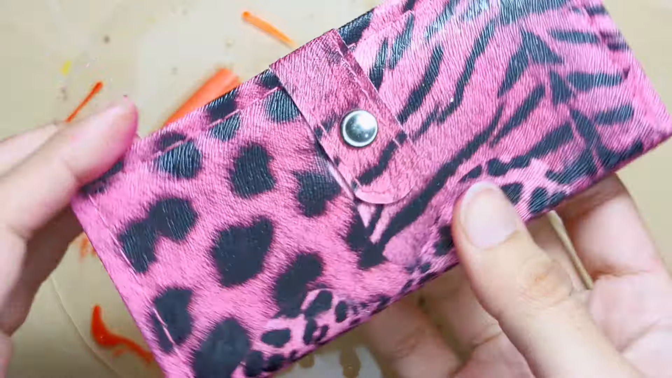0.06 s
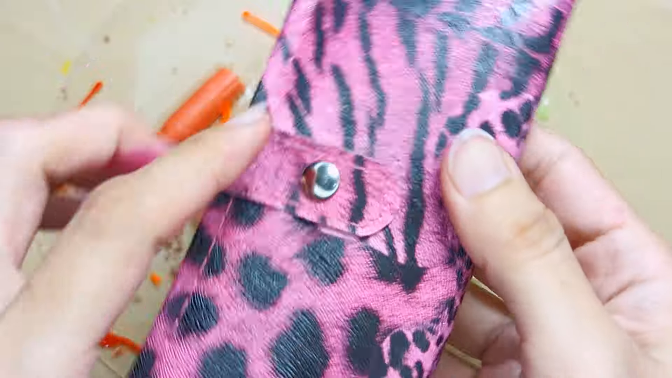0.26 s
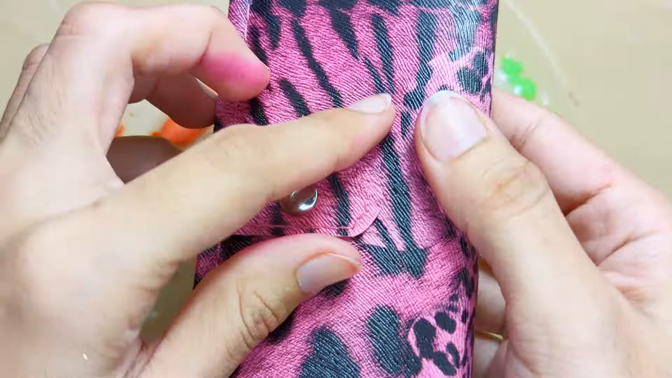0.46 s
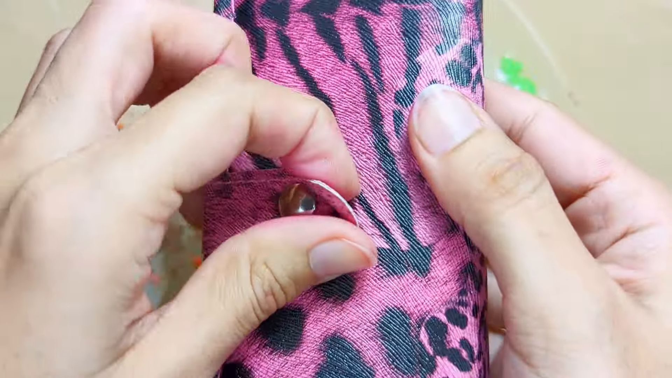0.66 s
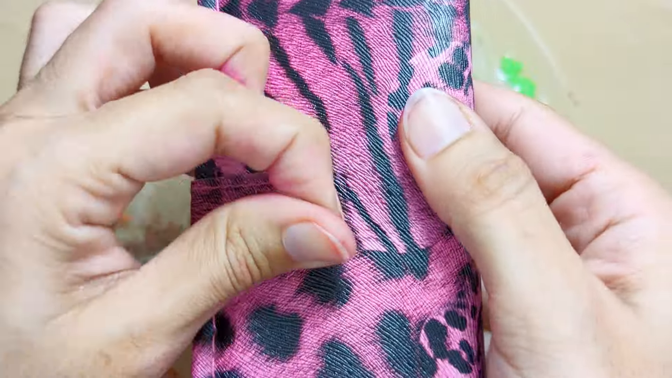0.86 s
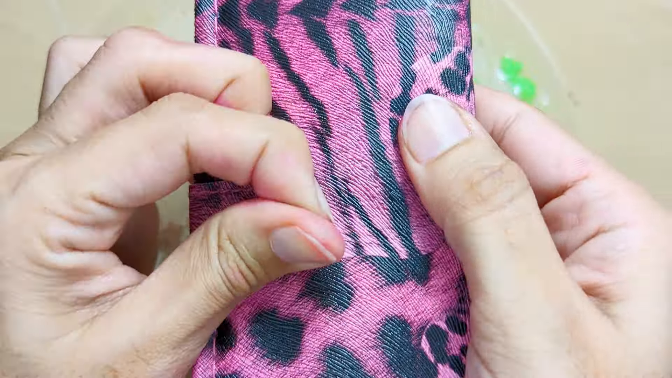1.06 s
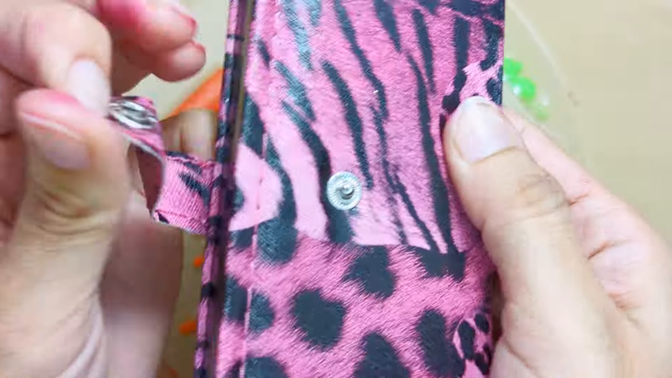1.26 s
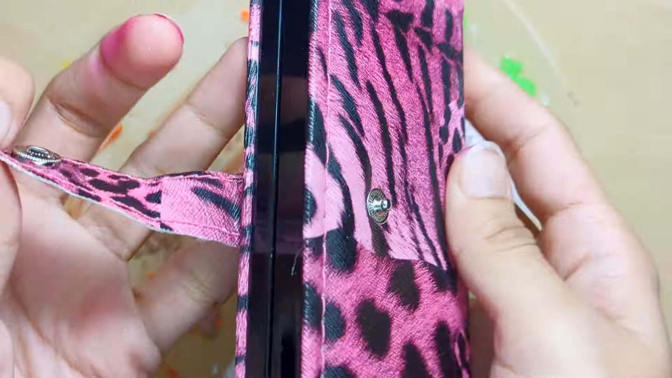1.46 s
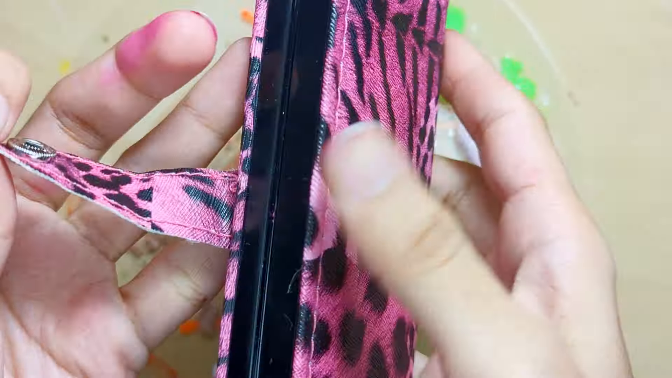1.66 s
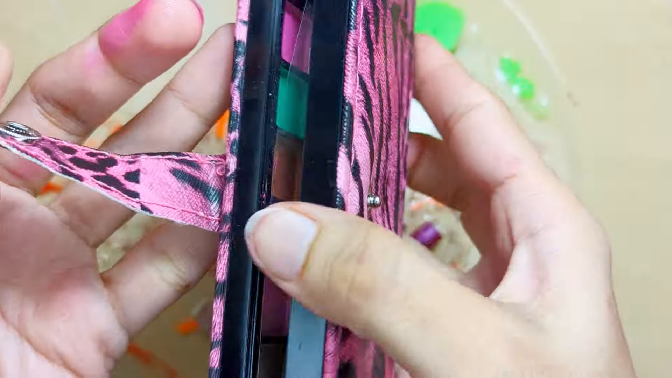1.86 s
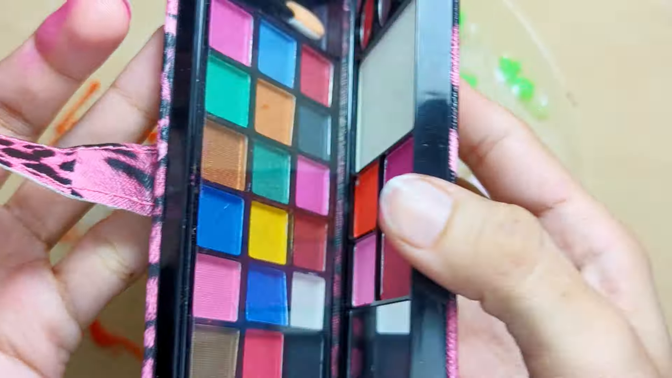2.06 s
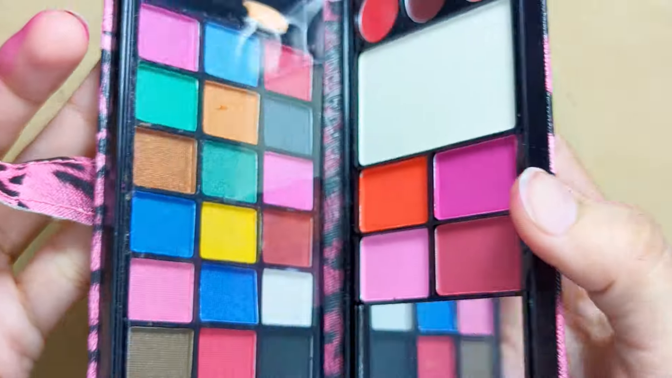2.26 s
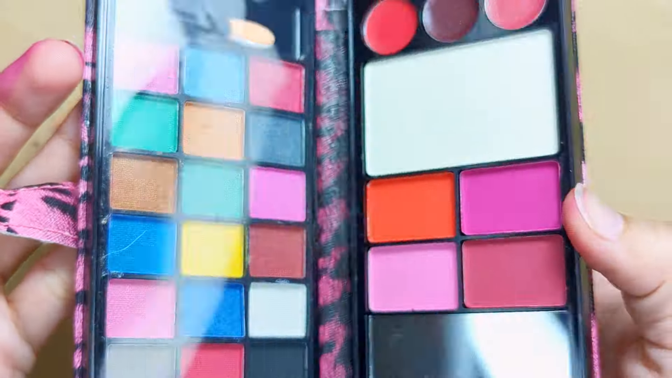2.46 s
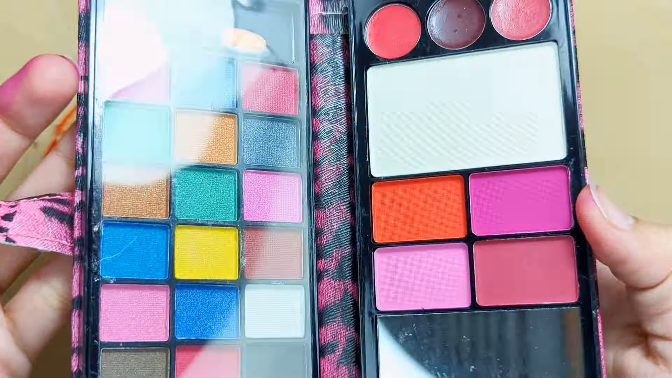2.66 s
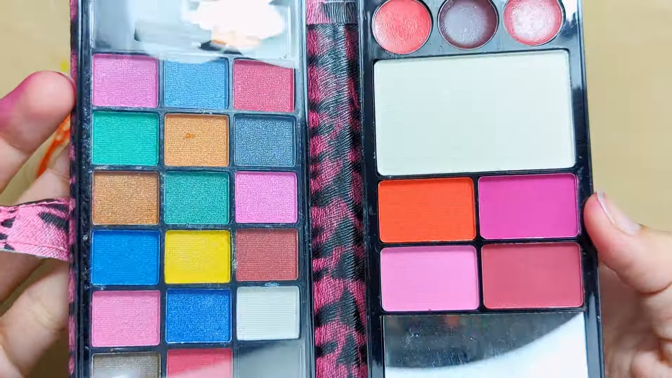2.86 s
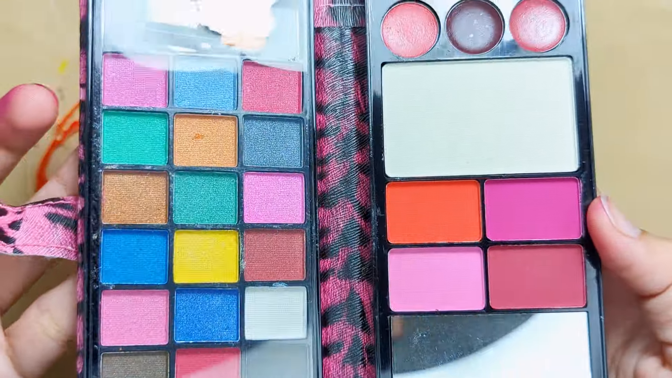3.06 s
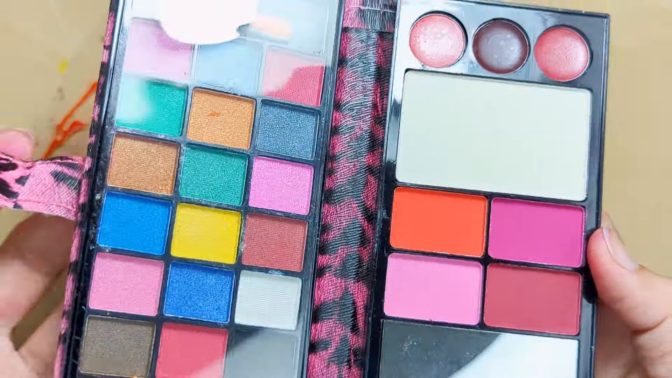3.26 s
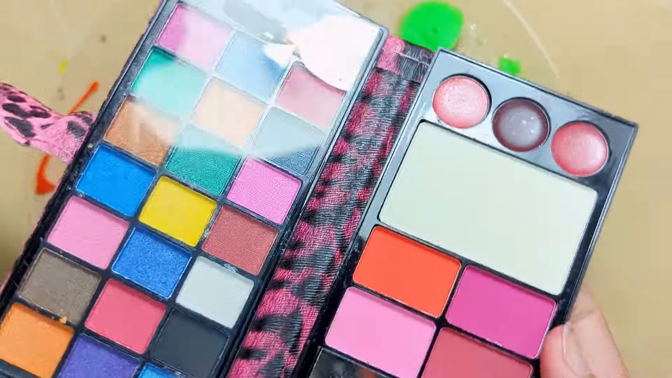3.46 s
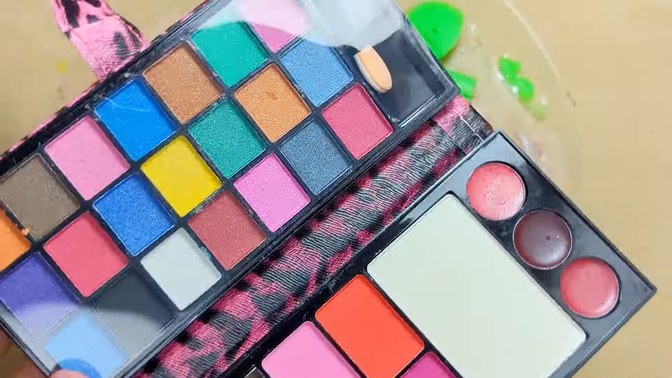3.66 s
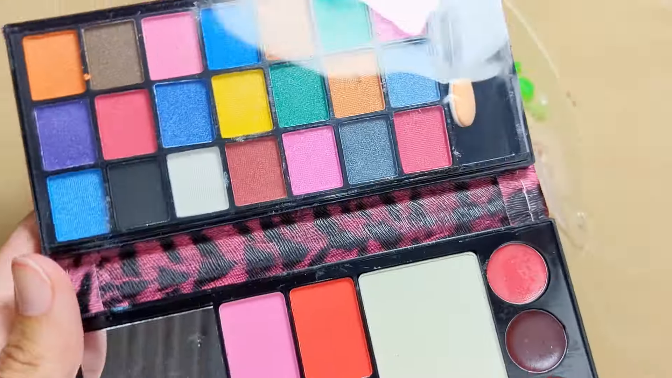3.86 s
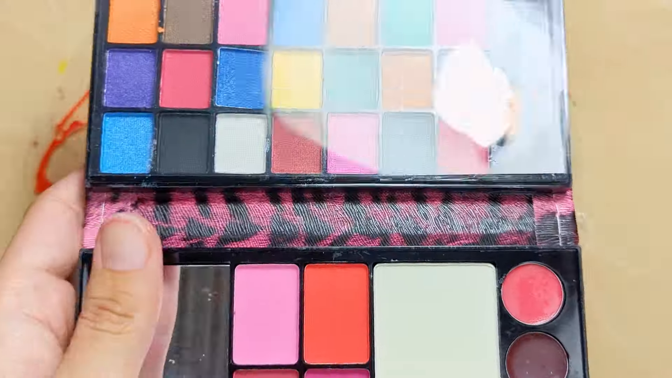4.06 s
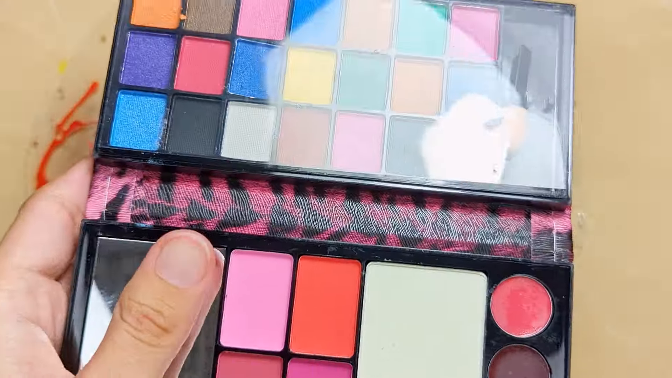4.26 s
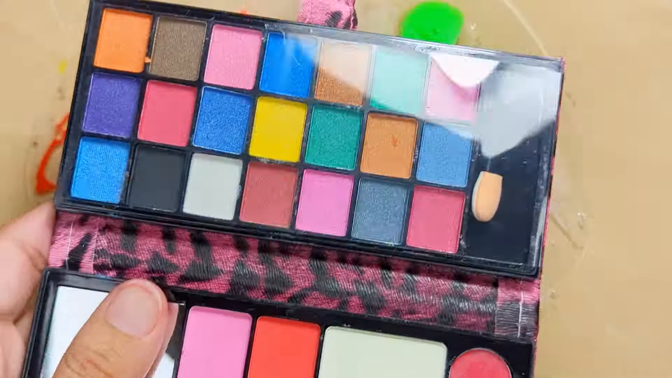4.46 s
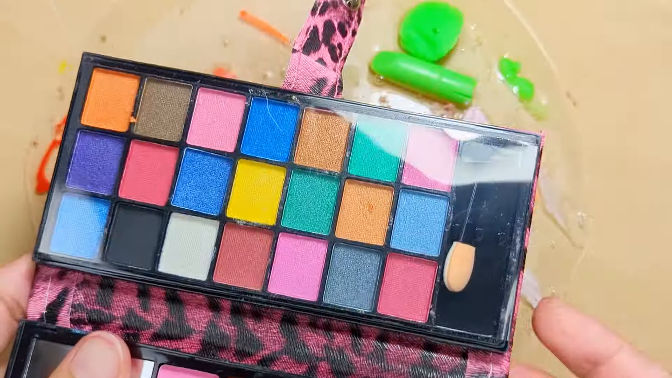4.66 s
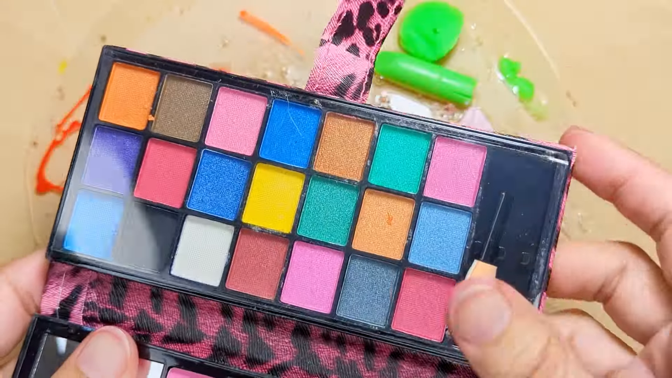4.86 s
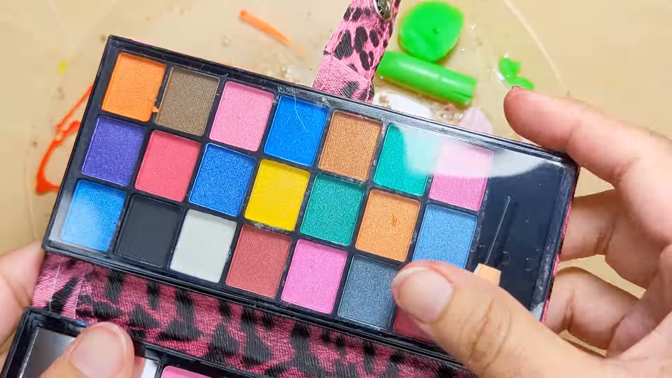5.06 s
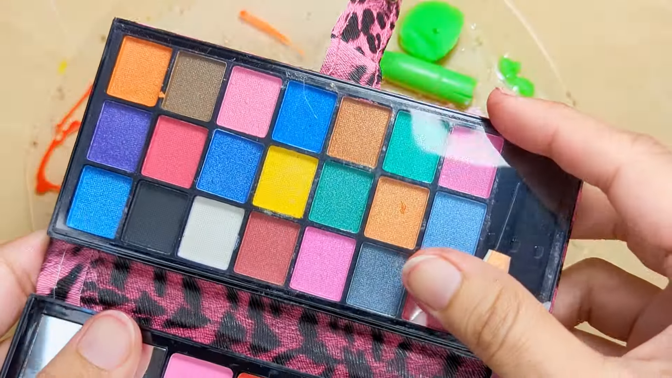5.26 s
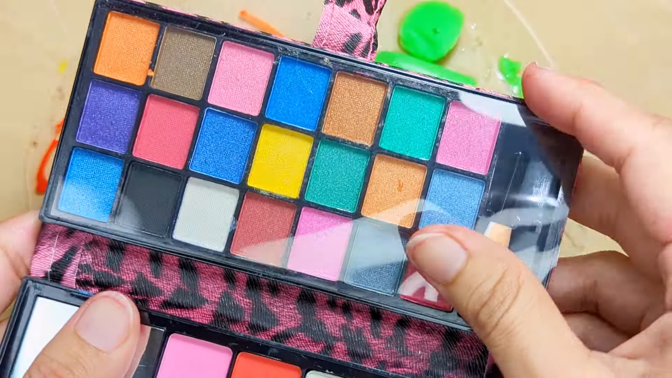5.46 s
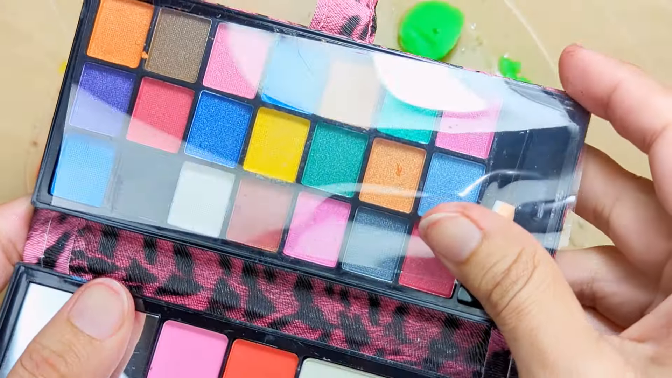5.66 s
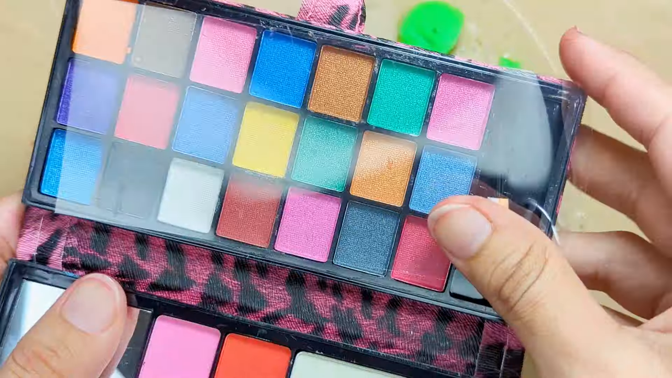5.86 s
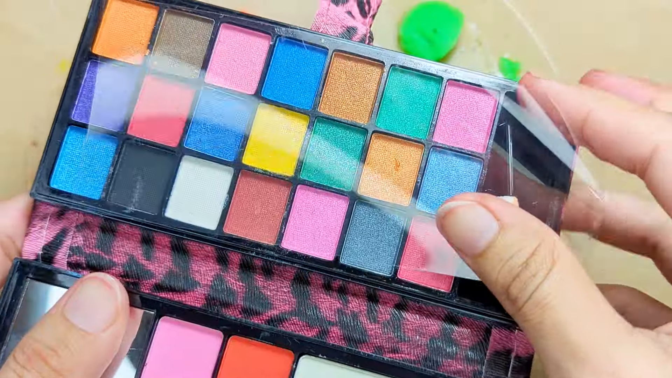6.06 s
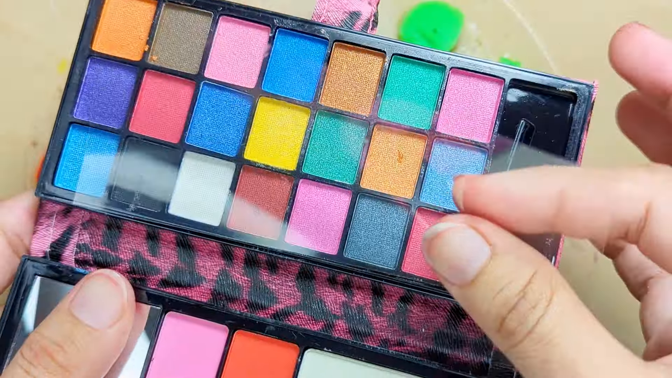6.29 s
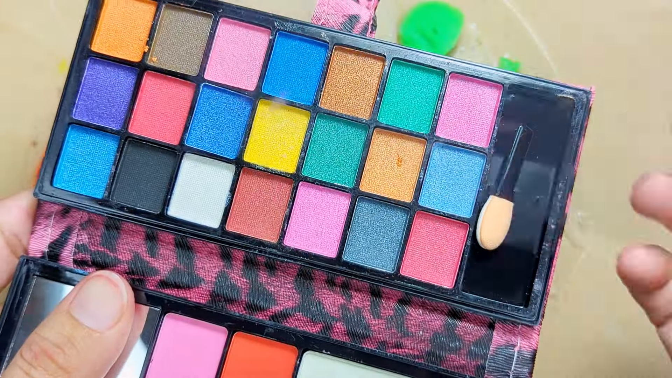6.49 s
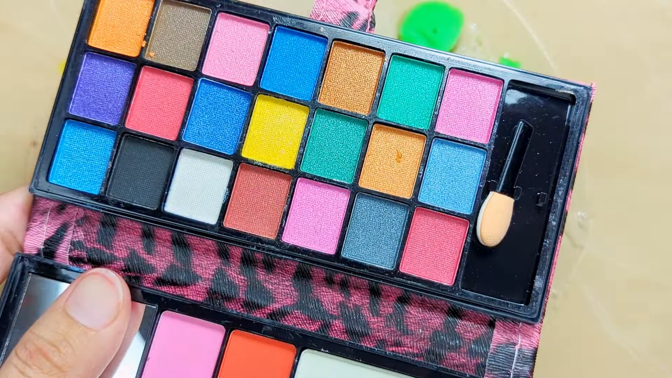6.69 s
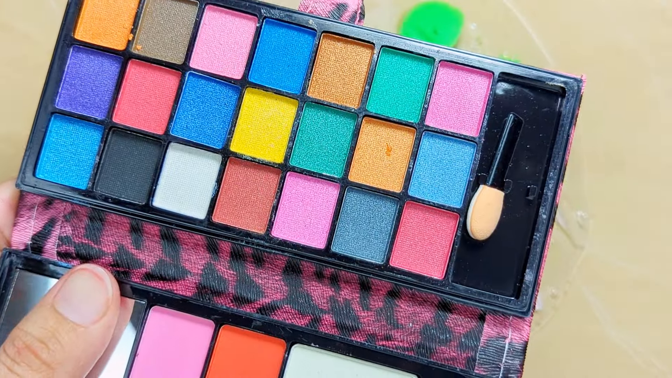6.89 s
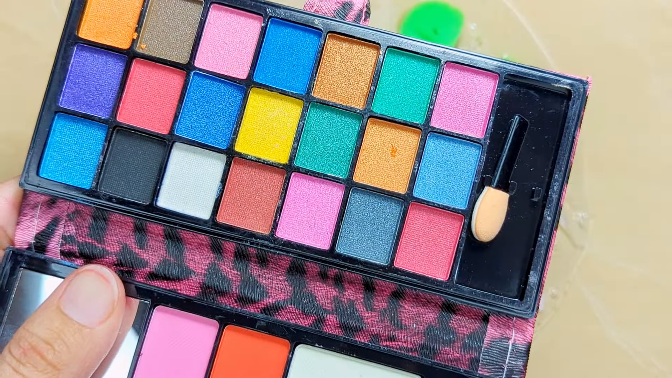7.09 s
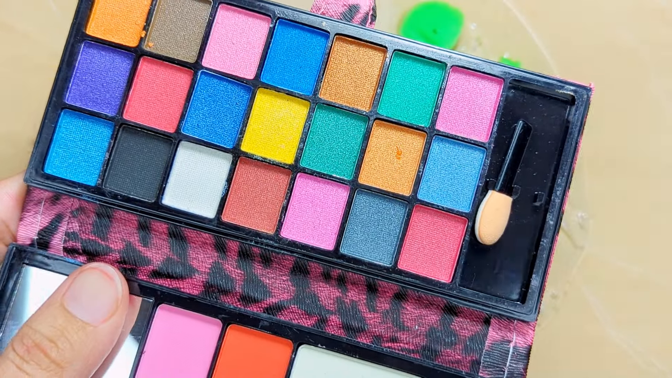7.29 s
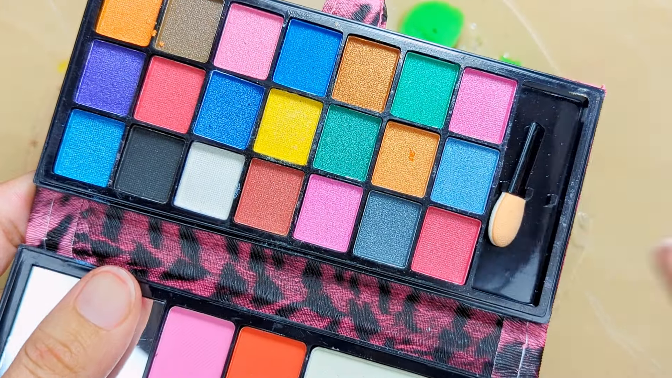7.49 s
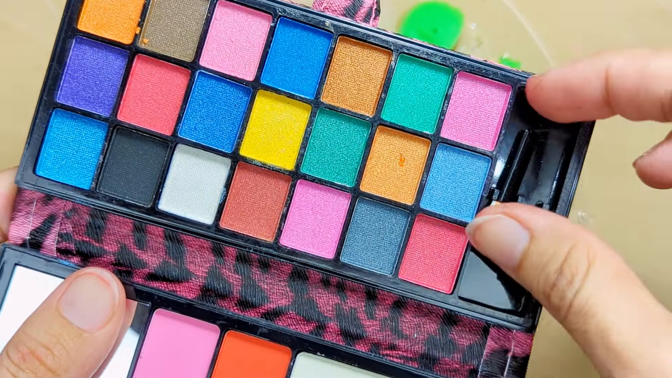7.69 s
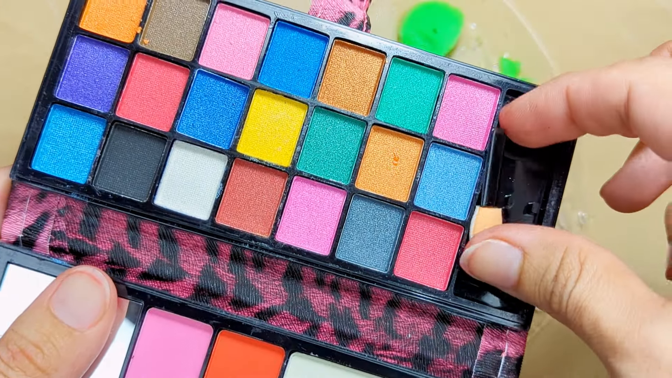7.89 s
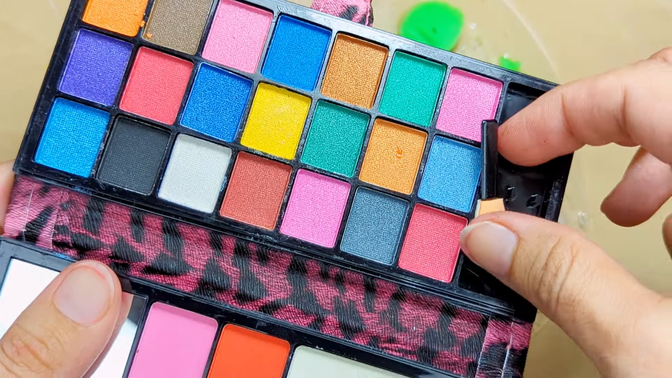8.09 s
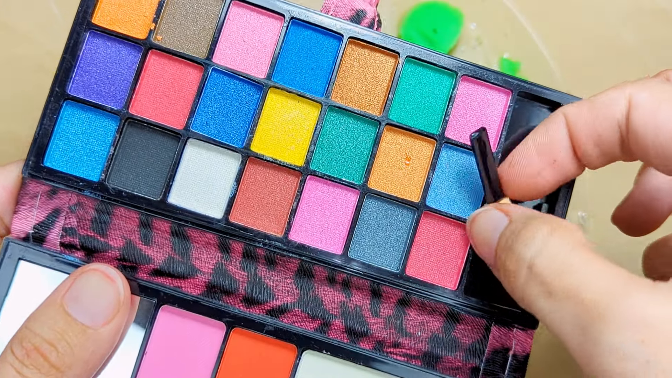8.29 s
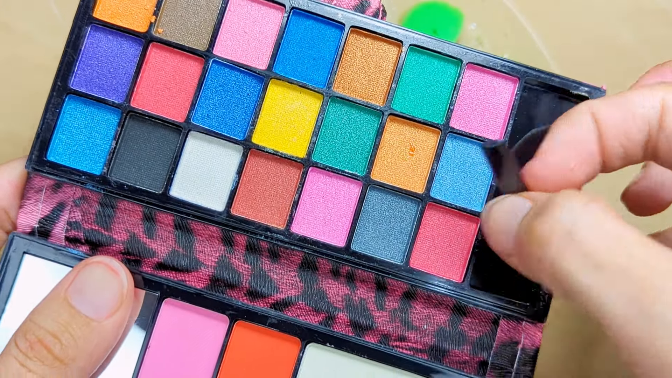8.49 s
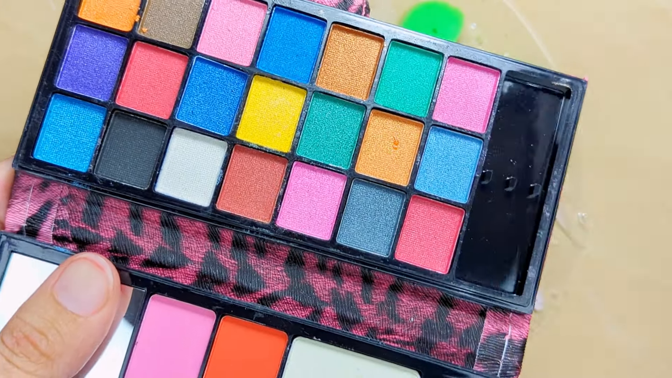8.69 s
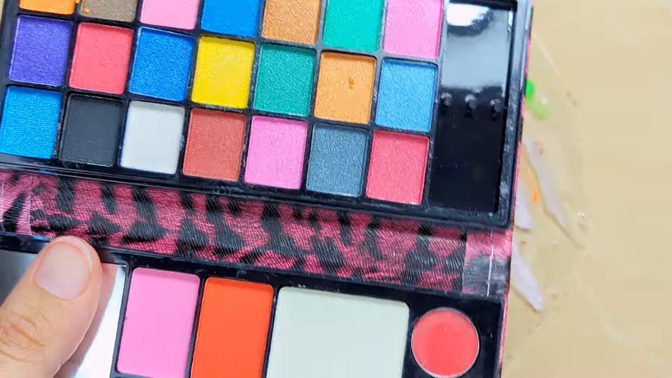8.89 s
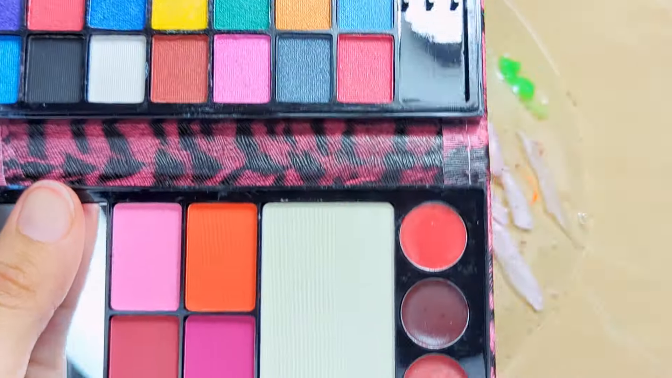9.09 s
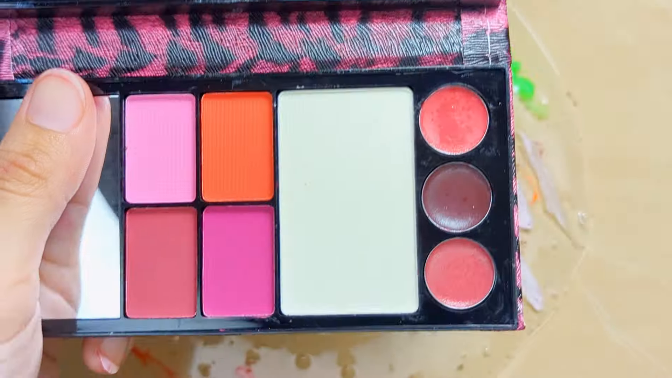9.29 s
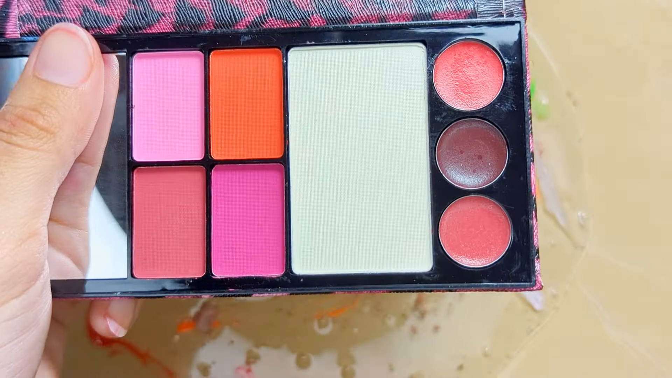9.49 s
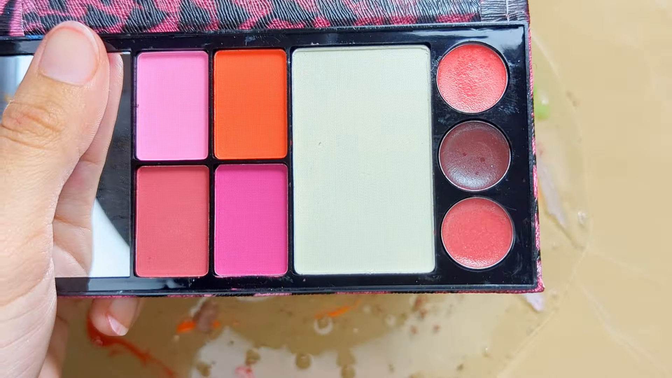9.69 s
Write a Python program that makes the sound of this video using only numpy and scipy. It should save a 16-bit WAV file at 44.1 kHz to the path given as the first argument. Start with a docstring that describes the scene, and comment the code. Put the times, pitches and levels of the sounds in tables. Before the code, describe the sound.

Small, dry handling sounds in stereo over a low mains hum and soft hiss. Brief finger rubs and a dull tap lead to a harsh stud snap just after one second. The case opens with rubs and bright ticks; turning it is almost silent. Around six seconds a flexible plastic sheet crackles loose with a sharp double snap and puff, then sparse clicks and a final dull bump.

```python
"""Opening a plastic makeup case

A padded plastic makeup case is handled close to two microphones in a quiet room with a mains hum.
Its metal press stud pops open, a sum of damped modes and a noisy crack that overloads the microphones.
Fingers rub the leatherette cover, a clear plastic sheet is scraped off the palette, and a small applicator
is prised from its slot: strokes are grains of tiny slips, and clicks are decaying bursts,
both coloured by the resonances of the plastic. The walls add a decaying tail."""
import sys
import numpy as np
from scipy import signal
from scipy.fft import rfft, irfft, next_fast_len
from scipy.io import wavfile
from scipy.ndimage import map_coordinates

SR = 44100
rng = np.random.default_rng(int(sys.argv[2]) if len(sys.argv) > 2 else 0)


def generate_wav(sig):
    """Save sig (samples, or channels by samples) to the path in sys.argv[1] as 16-bit PCM at SR."""
    pcm = np.round(np.clip(np.atleast_2d(sig).T, -1, 1) * 32767).astype(np.int16)
    wavfile.write(sys.argv[1], SR, pcm)


N = 429707


def amp(db):
    """Level to amplitude: 20 dB is a factor of ten."""
    return 10 ** (np.asarray(db) / 20)


def unit(x):
    """Normalization: scale to an rms of 1."""
    return x / np.sqrt(np.mean(x ** 2) + 1e-20)


def along(points, hz):
    """Interpolation on a logarithmic frequency axis through (Hz, value) points."""
    point_hz, values = np.transpose(points)
    return np.interp(np.log(hz + 1), np.log(point_hz + 1), values)


def filtered(x, response):
    """Linear filtering: the spectrum of x is multiplied by a response of frequency."""
    n = x.shape[-1]
    padded = next_fast_len(n + 2048)
    spectrum = rfft(x, padded) * response(np.fft.rfftfreq(padded, 1 / SR))
    return irfft(spectrum, padded)[..., :n]


def pair(size, gain, alike):
    """Partial coherence: mid and side noises share power so that left and right correlate as asked."""
    def mid_side_gains(hz):
        angle = np.arccos(np.clip(along(alike, hz), -1, 1)) / 2
        return gain(hz) * np.array([np.cos(angle), np.sin(angle)])
    mid, side = filtered(rng.standard_normal((2, size)), mid_side_gains)
    return np.array([mid + side, mid - side])


# Steady tones of the mains. Each row: frequency in Hz, level in dB rms.
HUM_TONES = [(100, -56), (200, -80)]
# Spectrum of the low room noise. Each row: frequency in Hz, relative density in dB per Hz.
RUMBLE_SPECTRUM = [(20, -29), (35, -18), (50, -1.5), (65, 0.5), (85, 0), (130, -8), (220, -10), (380, -8),
                   (520, -11.5), (800, -27), (1500, -70.5)]
# Spectrum of the hiss. Each row: frequency in Hz, relative density in dB per Hz.
HISS_SPECTRUM = [(290, -31), (500, -9), (726, -9), (900, -15.5), (1100, -16.5), (1450, -20.5),
                 (2600, -22.5), (3500, -29), (5200, -36), (6500, -36), (8000, -43), (9300, -40),
                 (15500, -45.5)]
# Coherence of the room noise. Each row: frequency in Hz, left-right correlation (1 is identical).
ROOM_COHERENCE = [(60, 1), (130, 0.4), (220, .3), (500, 0.27), (1500, 0.058)]


def background(rumble_db=-57.0, hiss_db=-68, whine_db=-95, whine_hz=6400, whine_width_hz=220):
    """Stationary sources: mains harmonics, shaped noise for rumble and hiss, narrow noise for a fuzzy whine."""
    t = np.arange(N) / SR
    hum = np.zeros(N)
    for hz, rms_db in HUM_TONES:
        hum += amp(rms_db) * np.sqrt(2) * np.sin(2 * np.pi * (hz * t + rng.random()))
    rumble = unit(pair(N, lambda hz: amp(along(RUMBLE_SPECTRUM, hz)), ROOM_COHERENCE))
    hiss = unit(pair(N, lambda hz: amp(along(HISS_SPECTRUM, hz)), ROOM_COHERENCE))
    whine_peak = lambda hz: 1 / (1 + ((hz - whine_hz) / whine_width_hz) ** 2)
    whine = unit(pair(N, whine_peak, ROOM_COHERENCE))
    return hum + amp(rumble_db) * rumble + amp(hiss_db) * hiss + amp(whine_db) * whine


# Decay of the room. Each row: frequency in Hz, time to fall by 60 dB in seconds.
ROOM_DECAY = [(200, 0.43), (1500, 0.3), (5000, 0.11), (12000, 0.1)]


def room(x, wet_db):
    """Reverberation: convolution with noise whose every frequency decays at its own rate."""
    hz, t, z = signal.stft(rng.standard_normal((2, SR // 2)), SR, nperseg=256)
    decay = amp(-60 * t / along(ROOM_DECAY, hz)[:, None])
    tail = signal.istft(z * decay, SR, nperseg=256)[1]
    onset_s = .006
    tail = tail * (1 - np.exp(-np.arange(tail.shape[1]) / SR / onset_s))
    unit_energy_tail = tail / np.linalg.norm(tail[0])
    return amp(wet_db) * signal.fftconvolve(x, unit_energy_tail, axes=1)[:, :N]


# Place of the hands. Each row: time in seconds, lead of the left microphone in seconds.
LEFT_LEAD = [(0, .0001), (1.1, .000115), (2.1, .00013), (5.4, .00038), (5.9, .00036), (6.25, .00014),
             (6.43, .00014), (6.65, .00032), (8, .00038), (9, 0)]


def add(track, s, sound):
    """Interaural-style delay: opposite phase slopes shift the channels by half the lead each."""
    lead = np.interp(s, *np.transpose(LEFT_LEAD))
    signs = np.array([[1], [-1]])
    placed = filtered(sound, lambda hz: np.exp(1j * np.pi * hz * lead * signs))
    start = round(s * SR)
    placed = placed[:, max(-start, 0):N - start]
    track[:, max(start, 0):][:, :placed.shape[1]] += placed


# Low (body) register of the plastic. Each row: frequency in Hz, relative level in dB before the body setting.
BODY_REGISTER = [(60, -25), (200, -7.5), (380, -1.5), (560, 5), (720, -1), (900, -5.5), (1350, 2.5),
                 (1700, -1.5)]
# Middle register of the plastic. Each row: frequency in Hz, relative level in dB.
MIDDLE_REGISTER = [(2100, 1), (2600, 2.5), (3500, -1), (4700, -0.5), (5600, -7)]
# Top (edge) register of the plastic. Each row: frequency in Hz, relative level in dB before the edge setting.
EDGE_REGISTER = [(6700, 4), (7900, -0.5), (9200, 1), (11500, -6.5), (15500, -20)]


def contact(size, body_db, edge_db, ring=lambda hz: 1):
    """Modal density: noise shaped by the plastic's crowded resonances, with rms 1 in the middle register."""
    body = [(hz, level + body_db) for hz, level in BODY_REGISTER]
    edge = [(hz, level + edge_db) for hz, level in EDGE_REGISTER]
    points = body + MIDDLE_REGISTER + edge
    # every point of contact stirs the modes in its own proportions
    modes = rng.standard_normal(size=400)
    uneven_db, mode_spacing_hz = 3, 90

    def gain(hz):
        uneven = map_coordinates(modes, [hz / mode_spacing_hz], mode="mirror")
        g = amp(along(points, hz) + uneven_db * uneven) * ring(hz)
        middle = (hz > 2200) * (hz < 6000)
        return g / np.sqrt(np.mean(g ** 2 * middle))

    return pair(size, gain, [(500, .9), (2000, 0.21), (9000, 0.2)])


def add_stroke(out, s, length, db, body_db, edge_db, gain_db=-1, fade_db=17,
               panel_hz=2450, panel_db=5, panel_width=0.25, damped_hz=18000):
    """Stick-slip friction: a swell of tiny random slips, each shaking the shell."""
    slips_per_s, slip_life_s, smooth = 3000, .0012, 2  # smooth: steady part under the slips
    waver_points_per_s, waver_db = 40, 1.5
    rise_share = .42  # of the stroke's length

    def panel(hz):
        resonance = amp(panel_db / (1 + ((hz / panel_hz - 1) / panel_width) ** 2))  # width relative to panel_hz
        return resonance / np.sqrt(1 + (hz / damped_hz) ** 8)

    rise, fall = length * rise_share, length * (1 - rise_share)
    t = np.arange(-2 * rise, 3 * fall, 1 / SR)
    # the pressure wavers along the stroke
    pressure = map_coordinates(rng.standard_normal(size=200), [(t - t[0]) * waver_points_per_s], mode="mirror")
    distance = np.abs(np.where(t < 0, t / rise, t / fall))
    stroke = amp(waver_db * pressure - fade_db * distance ** 1.6)
    slips = (rng.random(len(t)) < slips_per_s / SR) * rng.exponential(size=len(t))
    decaying_slips = signal.lfilter([1], [1, -np.exp(-1 / (slip_life_s * SR))], slips)
    grain = unit(smooth + decaying_slips)
    add(out, s + t[0], amp(db + gain_db) * stroke * grain * contact(len(t), body_db, edge_db, panel))


def add_click(out, s, db, ring_hz, body_db, edge_db, gain_db=5, t60=0.023,
              slide_db=-16, ring_db=10.5, ring_width=.13):
    """Impulsive release: a hard edge slides, catches and lets go, ringing briefly around its own pitch."""
    attack_s, slide_t60 = .0003, .028
    t = np.arange(-SR // 40, SR // 12) / SR
    after = np.maximum(t, 0)
    strike = amp(-60 * after / t60) * (1 - np.exp(-after / attack_s))
    # the slide swells up to the catch and fades half as fast after it
    slide = amp(slide_db - 60 * np.where(t < 0, -t, t / 2) / slide_t60)
    ring = lambda hz: amp(ring_db / (1 + ((hz / ring_hz - 1) / ring_width) ** 2))
    add(out, s + t[0], amp(db + gain_db) * (strike + slide) * contact(len(t), body_db, edge_db, ring))


# The case gliding through the hands as it is turned.
# Each row: time of the peak in seconds, length in seconds, level in dB before the stroke gain.
TURN_STROKES = [(3.62, 1, -77.5), (4.5, .4, -82.5), (5.615, 0.48, -75.5)]


def turns(body_db=2, edge_db=0.9):
    """Sliding friction: turning the case gives a long, faint, bright swish."""
    out = np.zeros((2, N))
    for s, length, db in TURN_STROKES:
        add_stroke(out, s, length, db, body_db, edge_db, panel_db=0.5)
    return out


# Fingers rubbing the leatherette. Each row: time of the peak in seconds, length in seconds,
# level in dB before the stroke gain, body register in dB.
RUB_STROKES = [(0.111, .16, -53.5, -1.5), (0.439, 0.14, -58, 10), (0.559, .08, -60.5, 6),
               (0.637, 0.056, -40, 5), (0.827, 0.077, -62.5, 8.5), (0.943, 0.11, -62, 2.5),
               (1.15, 0.1, -45, 3.5), (1.235, 0.089, -55.5, 0), (1.372, 0.056, -53, 8),
               (1.482, 0.13, -54.5, 0.5), (1.834, 0.053, -65.5, 16.5), (1.928, .07, -67.5, 14),
               (1.992, .06, -50, 1), (2.058, .095, -51.5, -1.5), (2.807, .09, -66, 7),
               (8.36, .054, -63.5, -7)]


def rubs(edge_db=-4.0, dulling=.85, panel_db=6.0, panel_growth=0.36):
    """Contact area: a flatter finger stirs more of the body and panel, and less of the edge."""
    out = np.zeros((2, N))
    for s, length, db, body_db in RUB_STROKES:
        add_stroke(out, s, length, db, body_db, edge_db - dulling * body_db,
                   panel_db=panel_db + panel_growth * body_db)
    return out


# Soft bumps of the hollow case. Each row: time in seconds, level in dB, lower mode in Hz,
# level of the upper mode in dB relative to the lower.
CASE_BUMPS = [(.3832, -36.5, 266, -5), (.389, -36, 575, -5), (1.128, -27.5, 455, 1), (1.147, -26, 612, -7),
              (3.91, -46, 219.4, -11), (9.077, -33.5, 396.6, -7.5), (9.114, -41, 403, -3),
              (9.294, -42.5, 453, -13.5)]


def bumps(upper_hz=705, t60=0.086, attack_s=0.00086):
    """Low modes: bumped by flap or hand, the hollow case rings at two pitches; the grip sets the lower."""
    out, t = np.zeros((2, N)), np.arange(SR // 4) / SR
    for s, db, low_hz, upper_db in CASE_BUMPS:
        ring = np.sin(2 * np.pi * low_hz * t) + amp(upper_db) * np.sin(2 * np.pi * upper_hz * t)
        envelope = amp(db - 60 * t / t60) * (1 - np.exp(-t / attack_s))
        add(out, s, envelope * np.array([ring, ring]))
    return out


# An edge catches, then slides on. Each row: time in seconds, level in dB before the click and stroke gains,
# ring in Hz, body register in dB, edge register in dB.
EDGE_CATCHES = [(0.381, -46, 2400, 12, -1.5), (0.5753, -54.5, 2280, 7, 1.5), (0.7188, -49, 2550, 8, -7),
                (1.8852, -57, 2700, 12.5, -6), (2.2274, -51, 7130, -9, -5), (2.4563, -52, 7964, -0.5, -5),
                (3.4705, -54.5, 1390, 5, -4), (5.6797, -45, 2700, 3.5, 0), (5.953, -46, 2687, 9, -14),
                (6.613, -50, 1520, 7, -18), (6.9276, -49.5, 2678, 6, -15),
                (7.1095, -49.5, 3010, 11.5, -4.5), (7.2196, -46, 3900, -3, -28),
                (9.0764, -55.5, 4300, 10, -14), (9.114, -65, 1200, 8, -19)]


def catches(lag_s=.008, slide_s=.042, slide_db=-5.5, slide_edge_db=-3.0):
    """Release into friction: each catch clicks and runs on as a short slide with less edge."""
    out = np.zeros((2, N))
    for s, db, ring_hz, body_db, edge_db in EDGE_CATCHES:
        add_click(out, s, db, ring_hz, body_db, edge_db)
        add_stroke(out, s + lag_s, slide_s, db + slide_db, body_db, edge_db + slide_edge_db)
    return out


# Clean clicks of hard plastic. Each row: time in seconds, level in dB before the click gain,
# ring in Hz, body register in dB.
PLASTIC_CLICKS = [(1.982, -48.5, 7200, 5.5), (2.0052, -50, 7700, 4), (2.0744, -36.5, 6800, -11.5),
                  (2.2972, -55, 3800, 4), (2.409, -48.5, 3500, -4), (2.417, -55.5, 9380, 2),
                  (4.73, -63.5, 1494, 13.5), (5.0745, -55.5, 4265, 3.5), (5.132, -67, 6500, -5),
                  (5.4167, -45, 4400, -5), (5.7794, -47.5, 4100, 5), (5.8312, -36.5, 4900, -10),
                  (6.0103, -53.5, 9100, 3.5), (6.1934, -46, 4200, -2), (6.217, -41.5, 7450, -7.5),
                  (6.238, -28.5, 3800, 0.5), (6.244, -26.5, 2590, -2.5), (6.4104, -56, 9100, 0.5),
                  (6.4262, -44, 8500, -5), (6.443, -42.5, 1920, 5.5), (6.656, -35, 2300, -6),
                  (7.9589, -32.5, 4510, -5), (8.3986, -60.5, 7680, 8)]


def clicks(edge_db=-7, edge_db_per_octave=9, middle_hz=4500):
    """Contact stiffness: the higher a click rings, the harder the contact and the brighter its edge."""
    out = np.zeros((2, N))
    for s, db, ring_hz, body_db in PLASTIC_CLICKS:
        octaves = np.log2(ring_hz / middle_hz)
        add_click(out, s, db, ring_hz, body_db, edge_db + edge_db_per_octave * octaves)
    return out


# The clear sheet scraping over the palette. Each row: time of the peak in seconds, length in seconds,
# level in dB before the stroke gain, body register in dB.
SHEET_SCRAPES = [(5.685, .07, -53, 2), (5.874, 0.077, -47, 0.5), (5.975, 0.071, -46, 6.5),
                 (6.154, 0.028, -50, -7), (6.207, 0.06, -46.5, -4), (6.242, .028, -20.5, -7),
                 (6.257, .04, -20, -6.5), (6.306, .09, -54, -3.5), (6.445, .055, -44.5, 8.5),
                 (6.65, .07, -35.5, 8.5), (6.716, 0.1, -61.5, 8), (6.799, 0.036, -60.5, 13),
                 (6.902, .07, -59, -2.5), (7.027, 0.098, -64, 17.5)]


def scrapes(edge_db=-10, dulling=0.27, panel_db=5.0, panel_growth=0.19, damped_hz=12000):
    """Damped friction: the limp sheet drags over the pans with little top, duller where it presses the tray."""
    out = np.zeros((2, N))
    for s, length, db, body_db in SHEET_SCRAPES:
        add_stroke(out, s, length, db, body_db, edge_db - dulling * body_db,
                   panel_db=panel_db + panel_growth * body_db, damped_hz=damped_hz)
    return out


def sheet(s=6.237, db=-29, rise_s=0.0016, t60=.13):
    """Air displacement: the flexed sheet springs free and flaps the air, a decaying low puff of noise."""
    out, t = np.zeros((2, N)), np.arange(SR // 4) / SR
    # (Hz, relative dB per Hz)
    puff = [(25, -26.5), (70, 2.0), (160, 3), (300, -2.5), (480, 0.5), (800, -11), (1500, -35)]
    air = unit(pair(len(t), lambda hz: amp(along(puff, hz)), [(100, 0.99)]))
    add(out, s, amp(db - 60 * t / t60) * (1 - np.exp(-t / rise_s)) * air)
    return out


def rattle(s=1.1705, gap_s=.044, db=-42, loss_db=4.0, ring_hz=6200, body_db=8,
           thinning_db=11.0, edge_db=-4, count=3):
    """Repeated impact with loss: the freed stud rattles on its flap, each touch weaker and thinner."""
    out = np.zeros((2, N))
    for k in range(count):
        add_click(out, s + k * gap_s, db - k * loss_db, ring_hz, body_db - k * thinning_db, edge_db)
    return out


# Modes of the struck case. Each row: frequency in Hz, relative level in dB,
# time to fall by 60 dB in seconds before the blow's length factor.
CASE_MODES = [(270, -19.5, 0.0083), (433, 1.5, 0.022), (540, -3.5, 0.048), (690, 0, 0.037), (1110, -8, .02),
              (1300, 2.5, 0.029), (1570, -4, .018), (1696, -1, 0.02), (2450, -19.5, 0.014),
              (2980, -9, 0.039), (3900, -23, .018), (4770, -16, 0.015), (6050, -12.5, 0.025),
              (7040, -16.5, 0.0097), (8600, -11.5, 0.0211), (9170, -12, .016)]
# Blows on the stud and case. Each row: time in seconds, level in dB before the ring and crack levels,
# corner of the contact in Hz, ring length factor.
STUD_BLOWS = [(.382, -17, 2540, 0.77), (1.1123, -10, 2500, 0.44), (1.1146, 0.5, 12000, 0.96)]


def stud(ring_db=-5, crack_db=-19, crack_t60=0.041, attack_s=0.0005, bass_hz=130):
    """Modal synthesis: the stud lets go with a crack and the case rings; a fingertip's blow is duller."""
    out, t = np.zeros((2, N)), np.arange(SR // 4) / SR
    for s, db, corner_hz, length in STUD_BLOWS:
        ring = np.zeros(len(t))
        for k, (hz, level, t60) in enumerate(CASE_MODES):
            polarity = (-1) ** k
            ring += polarity * amp(level - 60 * t / (t60 * length)) * np.sin(2 * np.pi * hz * t)
        crack = amp(crack_db - 60 * t / crack_t60) * contact(len(t), -2, -4.3)
        blow = amp(db) * (amp(ring_db) * ring + crack) * (1 - np.exp(-t / attack_s))

        # a soft contact dulls the blow, and the small case radiates little bass
        def radiation(hz):
            softness = 1 / (1 + 1j * hz / corner_hz)
            return softness * 1j * hz / (bass_hz + 1j * hz)

        add(out, s, filtered(blow, radiation))
    return out


def scene():
    """Superposition: the handling, its reverberation and the background add up."""
    handling = turns() + rubs() + bumps() + catches() + clicks() + scrapes() + sheet() + rattle() + stud()
    return background() + room(handling, wet_db=-23.5) + handling


def record(dry, soft_hz=13500, top_hz=15900, slope_hz=500):
    """Overload and band limiting: peaks flatten at full scale, the treble softens and ends at the top."""
    def response(hz):
        band_limit = np.clip((top_hz - hz) / slope_hz + .5, 0, 1)
        return band_limit / np.sqrt(1 + (hz / soft_hz) ** 10)
    return filtered(np.clip(dry, -1, 1), response)


dry = scene()
out = record(dry)
generate_wav(out)
```